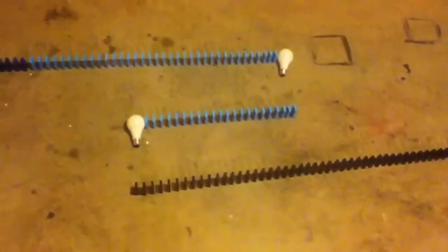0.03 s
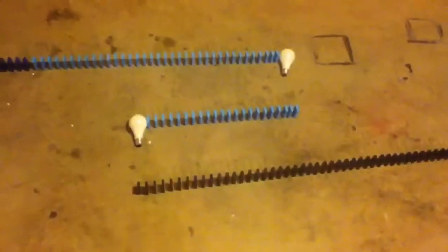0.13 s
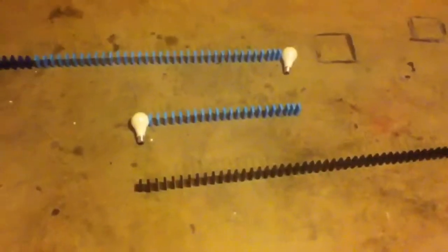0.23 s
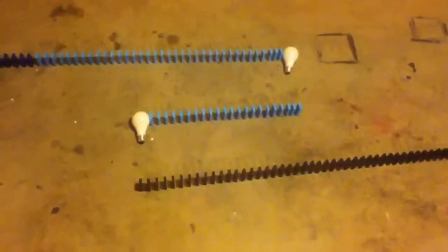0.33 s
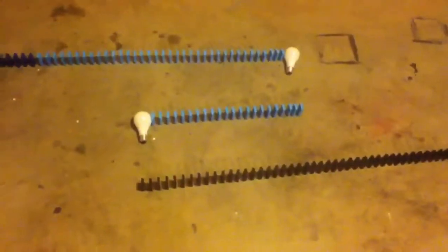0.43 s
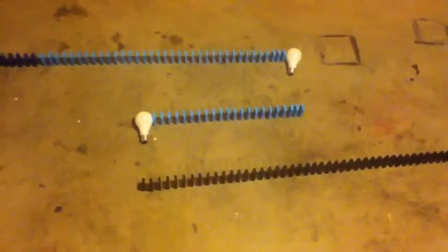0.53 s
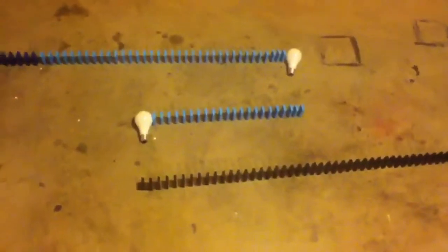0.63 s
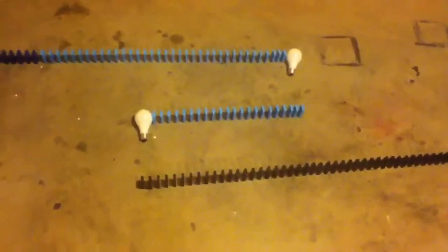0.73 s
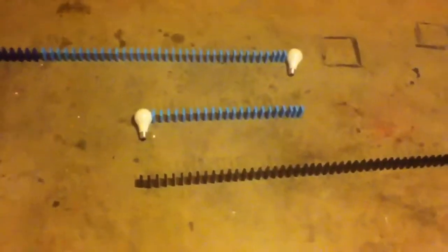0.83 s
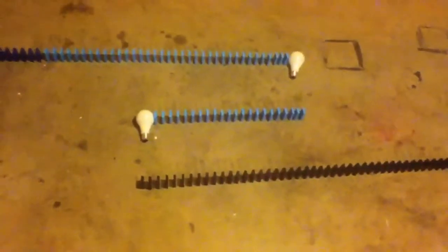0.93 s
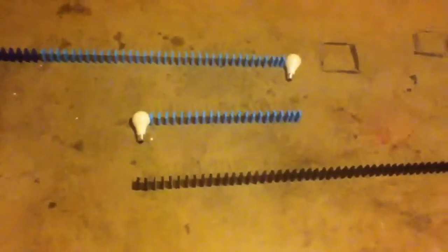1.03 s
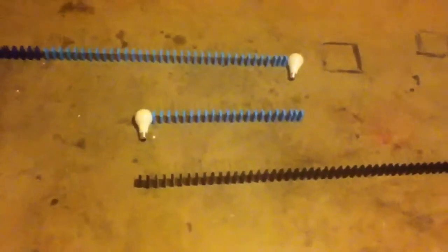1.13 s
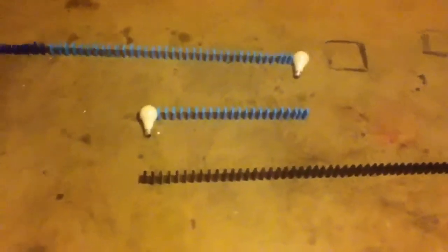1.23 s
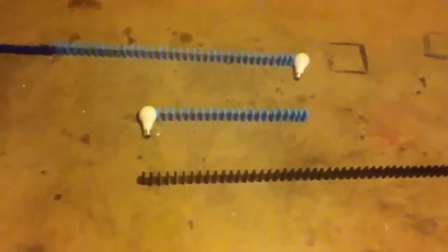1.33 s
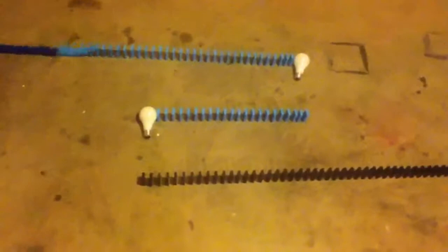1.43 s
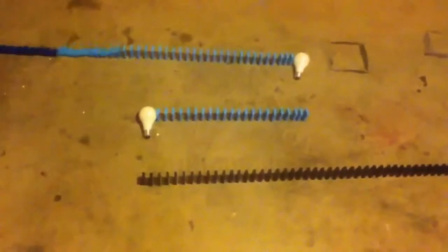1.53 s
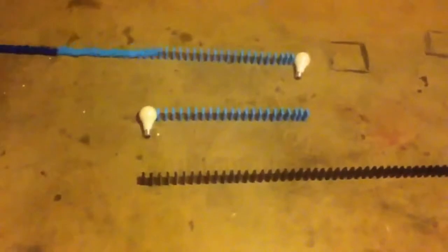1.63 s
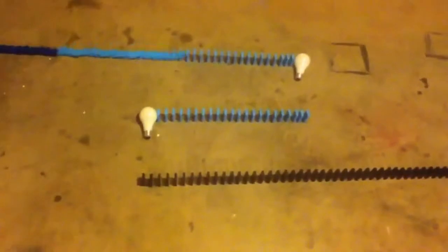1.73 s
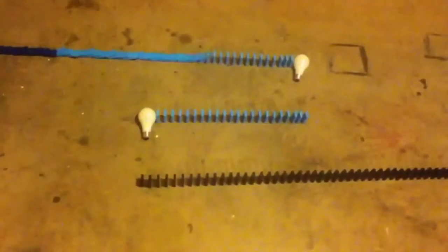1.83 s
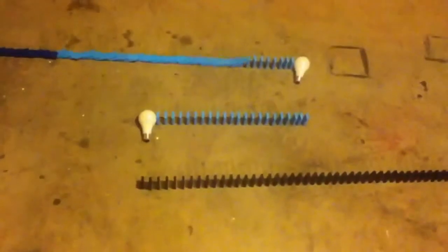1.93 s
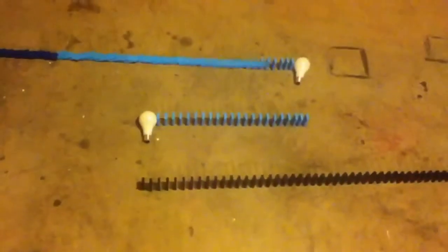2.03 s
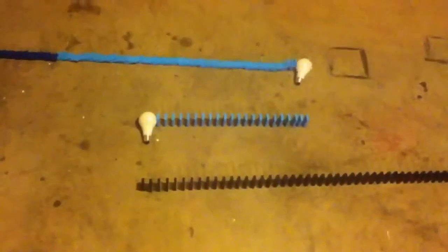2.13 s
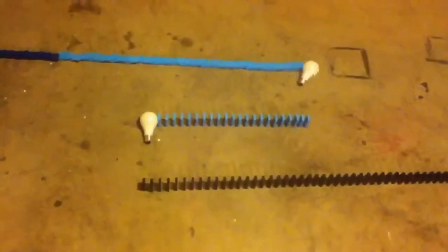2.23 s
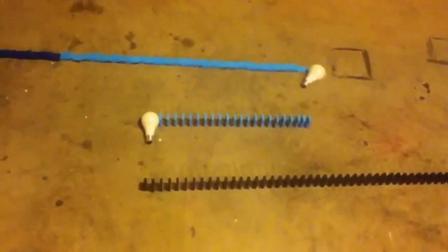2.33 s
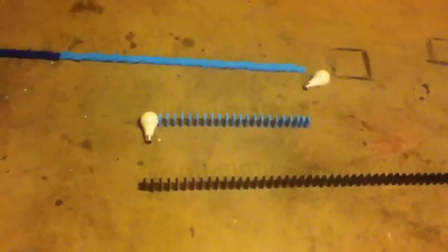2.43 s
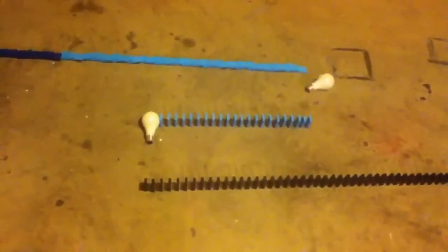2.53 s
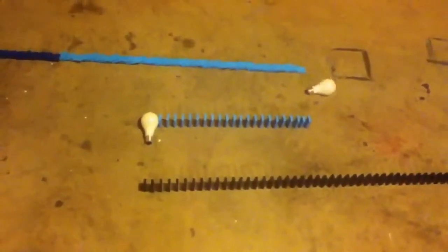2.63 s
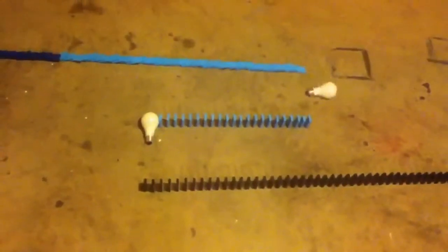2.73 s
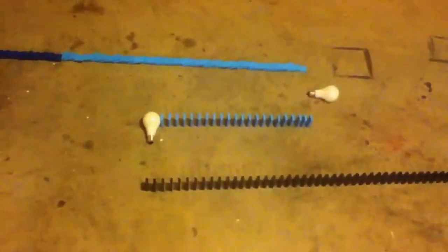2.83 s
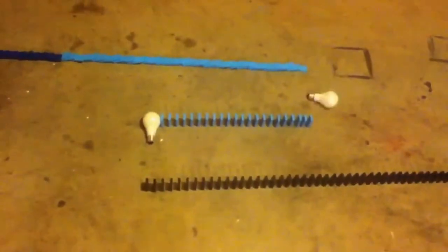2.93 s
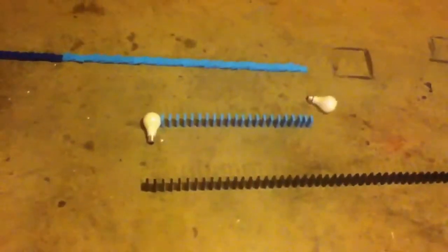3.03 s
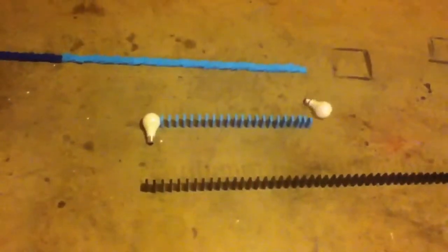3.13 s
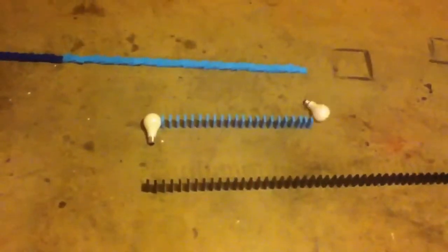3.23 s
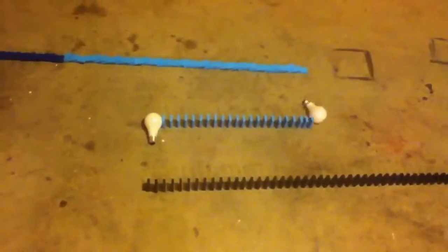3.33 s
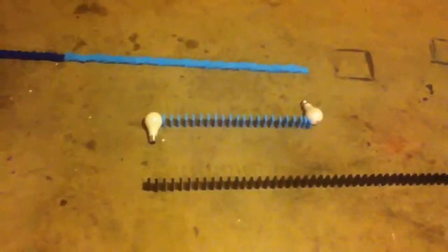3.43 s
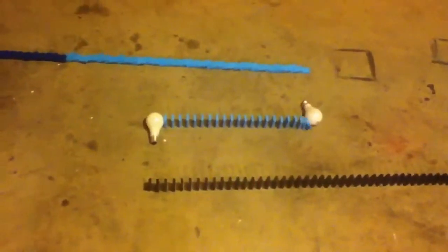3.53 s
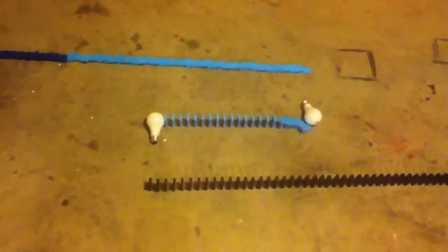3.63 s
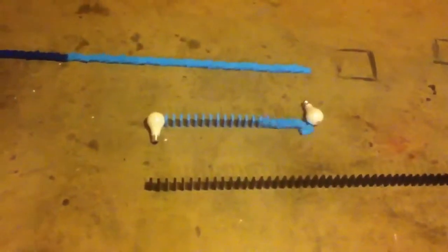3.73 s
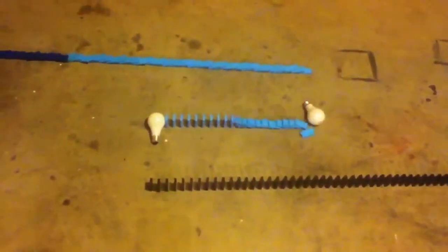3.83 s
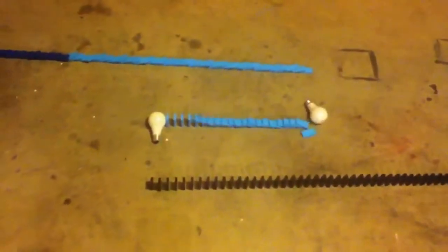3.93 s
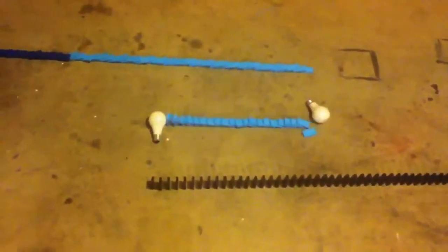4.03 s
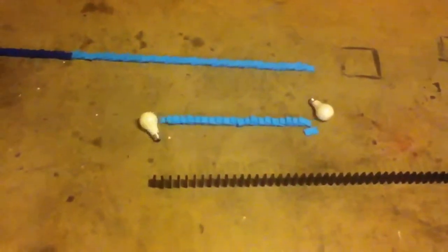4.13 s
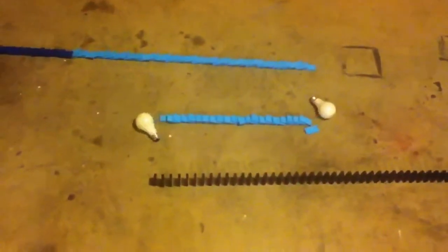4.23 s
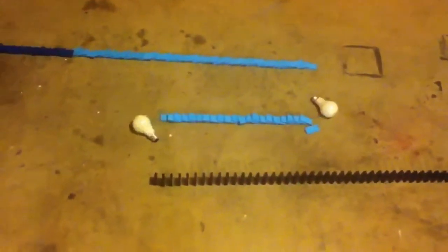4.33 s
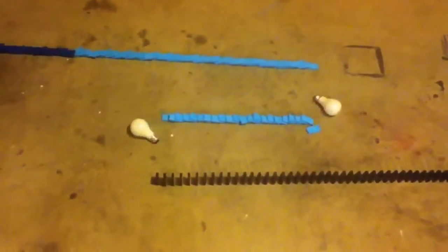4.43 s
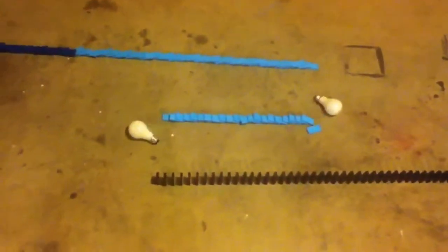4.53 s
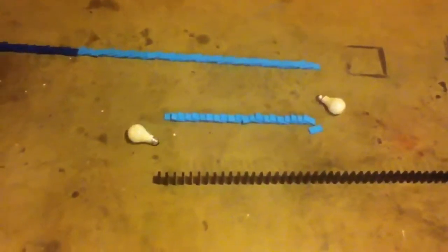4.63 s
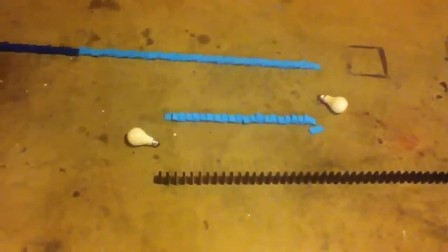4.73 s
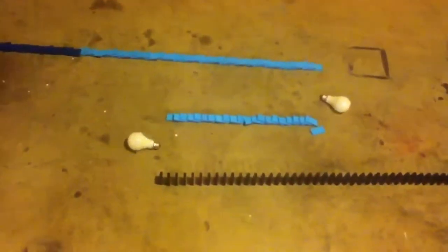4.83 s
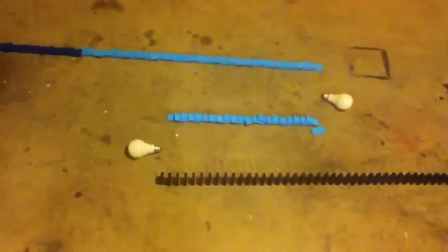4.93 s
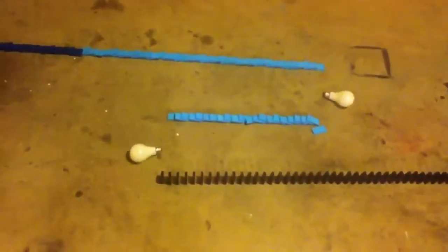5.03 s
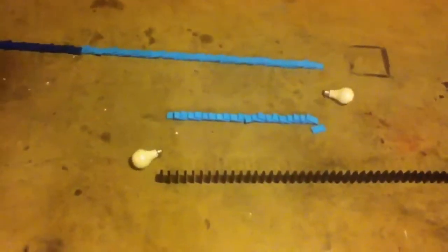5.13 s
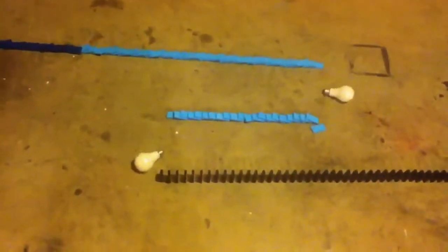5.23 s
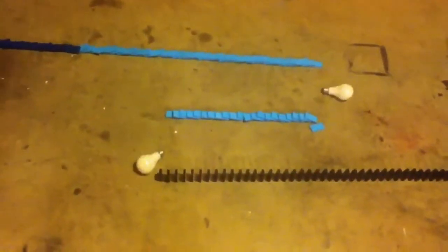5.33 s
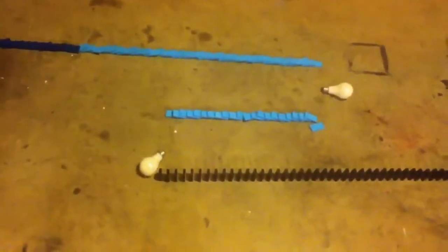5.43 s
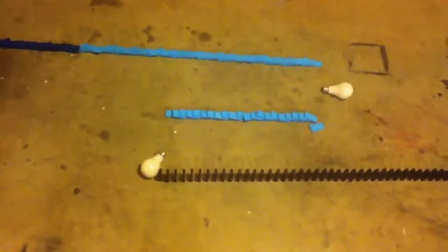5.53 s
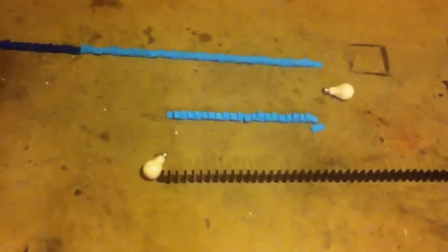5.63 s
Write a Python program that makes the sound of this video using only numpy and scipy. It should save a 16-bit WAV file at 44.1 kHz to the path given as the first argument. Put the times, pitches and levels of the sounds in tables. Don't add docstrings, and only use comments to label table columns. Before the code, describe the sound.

Over low ventilation hum in a bare, reverberant room, plastic dominoes begin with a few separate clicks, then speed into a dense bright clatter ending in sharp slaps and a clink of a glass bulb. After a near pause, small glass knocks start a second, shorter clatter. Another bulb clinks, rolls faintly over grit and gives a last tap. Heard from a phone held above the floor.

```python
import sys
import numpy as np
from scipy import signal
from scipy.fft import rfft, irfft
from scipy.io import wavfile
from scipy.ndimage import uniform_filter1d

SR = 44100
rng = np.random.default_rng(int(sys.argv[2]) if len(sys.argv) > 2 else 0)


def gain_from_db(level_db):
    decades = np.asarray(level_db, float) / 20
    return 10 ** decades


def inscribe(sig):
    pcm = np.round(np.clip(np.atleast_2d(sig).T, -1, 1) * 32767)
    wavfile.write(sys.argv[1], SR, pcm.astype(np.int16))


N = 250488


def colour(x, points):
    hz, db = np.transpose(points)
    f = np.fft.rfftfreq(len(x), 1 / SR) + 1
    gain_db = np.interp(np.log(f), np.log(hz), db)
    return irfft(rfft(x) * gain_from_db(gain_db), len(x))


def unit(x):
    return x / np.sqrt(np.mean(x ** 2))


def band(x, hz, width_hz):
    b, a = signal.iirpeak(hz, hz / width_hz, fs=SR)
    return signal.lfilter(b, a, x)


def decay(t, t60_s):
    return np.exp(-np.log(1000) * t / t60_s)


def ring(out, s, hz, db, t60_s):
    onset_s = 0.0015
    t = np.arange(int(1.2 * np.max(t60_s) * SR) + 1) / SR
    start = np.round(np.asarray(s) * SR).astype(int)
    wave = gain_from_db(db)[:, None] * np.sin(2 * np.pi * np.outer(hz, t))
    wave *= decay(t, np.asarray(t60_s)[:, None])
    wave *= 1 - np.exp(-t / onset_s)
    where = start[:, None] + np.arange(len(t))
    return out + np.bincount(where.ravel(), wave.ravel(), N + SR)[:N]


def cracks(s, db, points, length_s):
    size = 512
    burst = rng.standard_normal((len(s), size)) * np.exp(-np.arange(size) / (length_s * SR))
    burst *= (gain_from_db(db) / np.linalg.norm(burst, axis=1))[:, None]
    where = np.round(np.asarray(s) * SR).astype(int)[:, None] + np.arange(size)
    white = np.bincount(where.ravel(), burst.ravel(), N + SR)[:N]
    return colour(white, points)


def air():
    # t/s, level/dB, rumble relative level/dB
    air_course = [(0.0, -47, -4.5), (2.3, -46.5, -3.5), (2.5, -49, -2.5), (3.5, -48, -3),
                  (3.9, -47.5, -0.5), (5.68, -47.5, 1.5)]
    # f/Hz, level/dB per Hz
    air_spectrum = [(12, -68), (20, -26), (108, -6.5), (147, -12.5), (183, -1.5), (331, -13.5),
                    (463, -11.5), (548, -14.5), (725, -12), (1170, -20), (2640, -31), (3030, -25.5),
                    (3800, -30.5), (15000, -35.5), (16300, -65)]
    # f/Hz, width/Hz, level/dB
    duct_modes = [(97, 28, -14.5), (124.8, 6.7, -5.5), (174.1, 4.1, 0), (197, 6.1, 1), (256.4, 3, -6),
                  (365.7, 6.3, 0), (471.5, 5.1, -6), (577.6, 7.9, -9), (776, 1.8, -8.5), (3130, 25, -19),
                  (5320, 82, -18.5)]
    s, hum_db, rumble_db = np.transpose(air_course)
    t = np.arange(N) / SR
    broad = unit(colour(rng.standard_normal(N), air_spectrum))
    duct = sum(gain_from_db(db) * unit(band(rng.standard_normal(N), hz, width_hz))
               for hz, width_hz, db in duct_modes)
    rumble = unit(band(band(rng.standard_normal(N), 310, 100), 310, 100))
    swell = gain_from_db(2.2 * np.interp(t, s, rumble_db) - 3.5)
    mix = gain_from_db(-0.5) * broad + gain_from_db(-7.5) * duct + swell * rumble
    return gain_from_db(np.interp(t, s, hum_db)) * mix


def upper_modes(out, s, db):
    # f/Hz, level under the crack/dB, t60/s
    tile_modes = [(5400, -17, 0.041), (7560, -5, 0.011), (11550, -8, 0.018), (12600, -5, 0.013)]
    chance = rng.standard_normal((2, len(tile_modes), len(s)))
    for (mode_hz, mode_db, t60_s), spot, tuning in zip(tile_modes, *chance):
        own_hz = mode_hz * (1 + 0.015 * tuning)
        own_db = db + mode_db + 3.0 * spot
        out = ring(out, s, own_hz, own_db, np.full(len(s), t60_s))
    return out


def tiles(s, crack_db, ring_db, hz):
    # f/Hz, level/dB per Hz
    crack_spectrum = [(60, -91), (500, -27), (1200, -17), (2500, -7), (3900, -3.5), (5100, 5), (6500, -4),
                      (8500, -5), (10200, -10), (12500, -10.5), (14300, -15), (16000, -37)]
    first_mode_t60_s = 0.035
    out = cracks(s, crack_db + 19.5, crack_spectrum, length_s=0.0018)
    out = ring(out, s, hz, ring_db, np.full(len(s), first_mode_t60_s))
    return upper_modes(out, s, crack_db - 4)


def rows():
    # t/s, crack peak/dB, ring relative/dB, first mode f/Hz
    end_tiles = [(0.49, -33.5, -3, 4900), (0.5975, -25.5, 0.5, 4910), (0.6577, -23, -3, 5030),
                 (0.6953, -18.5, 2, 5130), (0.7284, -14.5, -6, 5060), (0.7576, -35, 9, 5030),
                 (2.4041, -16, 7.5, 5060), (2.4184, -6, -27, 5000), (3.6305, -29.5, -35, 4990),
                 (3.712, -21, 1.5, 4910), (3.7567, -15.5, -0.5, 5150), (3.7909, -14, 2, 5110),
                 (4.246, -10.5, -4, 5180), (4.2713, -10, 1, 5260)]
    bounces = [(0.6034, -28.5, -9, 4900), (0.6609, -18.5, -23, 4920), (2.434, -39, 8, 5260),
               (2.4664, -15, 2.5, 5000), (2.4804, -31, 5, 5320), (3.476, -40.5, 7.5, 5160),
               (3.5484, -50, 8, 5170), (4.2854, -19.5, 9.5, 4990)]
    # t/s, crack peak/dB, ring level/dB
    first_blows = [(0.7788, -17.5, -19), (0.8073, -21, -24), (0.8253, -16, -32), (0.903, -15, -25),
                   (1.0143, -15.5, -27), (1.1297, -14, -18), (1.1655, -10, -16), (1.1932, -10, -15),
                   (1.2383, -12.5, -13.5), (1.331, -15.5, -18), (1.3545, -14.5, -14), (1.4288, -14.5, -8.5),
                   (1.4546, -14, -12), (1.543, -12.5, -10.5), (1.6168, -24, -19), (1.6907, -12, -25),
                   (1.7101, -10.5, -22), (1.782, -14.5, -15.5), (1.8001, -16.5, -18), (1.8289, -11.5, -11),
                   (1.8707, -14.5, -32), (1.9437, -16.5, -22), (1.9711, -18, -24), (1.9938, -13.5, -17),
                   (2.034, -12.5, -10), (2.0598, -13, -19), (2.1525, -21, -12), (2.2049, -12, -15),
                   (2.2555, -26, -15)]
    second_blows = [(3.8159, -10, -19), (3.8442, -23, -13), (3.8693, -11, -11), (3.8948, -12.5, -8),
                    (3.963, -13, -14), (3.9838, -10, -17), (4.0111, -13.5, -17), (4.0307, -9, -12.5),
                    (4.1057, -11, -10), (4.1224, -13, -13), (4.1442, -8, -16.5), (4.1693, -9.5, -20)]
    # t/s, ring level/dB, first mode f/Hz
    falling_waves = [
        [(0.745, -15, 5070), (0.79, -19.5, 5025), (1.09, -19, 4920), (1.3, -19, 5090), (1.46, -15, 4947),
         (1.6, -17.5, 5204), (1.9, -19.5, 5090), (2.26, -14.5, 5063), (2.3, -31, 4970)],
        [(3.8, -33, 5200), (3.83, -30, 5010), (3.92, -14, 5100), (4.01, -22, 5110), (4.076, -14.5, 4790),
         (4.144, -19.5, 5190), (4.2, -20, 5160)],
    ]
    tile_gap_s, chatter_per_s = 0.024, 420
    blow_crack_db, blow_ring_db, wave_crack_db = 1, 3.5, -6.5
    ring_scatter_db, tuning_spread = 6, 0.065

    s, crack_db, ring_db, hz = np.transpose(sorted(end_tiles + bounces))
    out = tiles(s, crack_db - 3.5, crack_db + ring_db - 2.5, hz)
    for wave, blows in zip(falling_waves, (first_blows, second_blows)):
        wave_s, wave_db, wave_hz = np.transpose(wave)
        clear_s, clear_crack_db, clear_ring_db = np.transpose(blows)
        gaps = np.maximum(np.round(np.diff(clear_s) / tile_gap_s), 1).astype(int)
        paced_s = np.concatenate([np.linspace(a, b, n + 1)[1:-1]
                                  for a, b, n in zip(clear_s, clear_s[1:], gaps)])
        wait, size, tuning, strength = rng.random((4, N // 100))
        loose_s = wave_s[0] + np.cumsum(-np.log(wait)) / chatter_per_s
        loose_s = loose_s[loose_s < wave_s[-1]]
        soft_s = np.concatenate([paced_s, loose_s])
        when_s = np.concatenate([clear_s, soft_s])

        loose_db = -11 + 7 * size[:len(loose_s)] ** 3
        size_db = np.append(np.full(len(paced_s), -3.0), loose_db)
        soft_db = np.interp(soft_s, wave_s, wave_db) + size_db
        ring_db = np.append(clear_ring_db + blow_ring_db, soft_db)
        crack_db = np.append(clear_crack_db + blow_crack_db, soft_db + wave_crack_db + 9.5)
        detune = tuning_spread * (tuning[:len(when_s)] - 0.5)
        own_hz = np.interp(when_s, wave_s, wave_hz) * (1 + detune)
        ring_db = ring_db + 2 * ring_scatter_db * (strength[:len(when_s)] - 0.5)
        out = out + tiles(when_s, crack_db, ring_db, own_hz)
    return out


def thuds(knocks):
    # f/Hz, level/dB per Hz
    thud_spectrum = [(60, -79.5), (400, -10), (900, 1.5), (1400, 5), (2200, 9), (4000, -6.5), (7000, -16),
                     (16000, -41)]
    s, db, thud_db, _ = np.transpose(knocks)
    return cracks(s, db + thud_db + 21.5, thud_spectrum, length_s=0.00033)


def flutter():
    rate_per_s, depth = 55, 0.2
    hold = SR // rate_per_s
    steps = np.repeat(rng.standard_normal(N // hold + 1), hold)
    return 1 + depth * uniform_filter1d(steps, size=hold)[:N]


def glass(knocks, modes, upper_db):
    swell_s, upper_per_thud = 0.004, 0.33
    t, out = np.arange(N) / SR, np.zeros(N)
    for k, (hz, mode_db, share) in enumerate(modes):
        envelope = np.zeros(N)
        for s, db, thud_db, t60_s in knocks:
            start = int(s * SR)
            since = t[:min(SR, N - start)]
            peak_db = db + mode_db
            if k > 0:
                peak_db += upper_db + upper_per_thud * thud_db
            swell = 1 - np.exp(-since / swell_s)
            envelope[start:start + SR] += gain_from_db(peak_db) * swell * decay(since, share * t60_s)
        out += envelope * flutter() * np.sin(2 * np.pi * hz * t)
    return out


def slaps():
    # t/s, peak/dB, upper modes relative/dB
    landings = [
        (2.4186, -9.5, -4),
        (2.4228, -7, -8),
        (3.983, -12, 0.5),
        (4.2714, 0, -20),
    ]
    # f/Hz, level/dB per Hz
    slap_spectrum = [(500, -48), (1500, -13), (2600, -2.5), (4500, -2.5), (7000, 1), (12000, -4.5),
                     (14500, -4), (16500, -25)]
    s, db, upper_db = np.transpose(landings)
    crack = cracks(s, db + 11, slap_spectrum, length_s=0.00012)
    return upper_modes(crack, s, db + upper_db + 8)


def rolling():
    # t/s, level/dB
    roll_course = [
        (4.84, -90),
        (4.95, -66),
        (5.1, -59),
        (5.3, -60),
        (5.4, -66),
        (5.55, -90),
    ]
    # f/Hz, level/dB per Hz
    grit_spectrum = [(60, -80), (400, -12), (900, 4), (1400, 7.5), (2200, -5.5), (4000, -19), (16000, -50)]
    # t/s, peak/dB, f/Hz, t60/s
    far_bump = (5.515, -34, 307.5, 0.1)
    ticks_per_s = 150
    s, db = np.transpose(roll_course)
    ticks = rng.standard_normal(N) * (rng.random(N) < ticks_per_s / SR)
    grind = unit(colour(ticks, grit_spectrum)) * gain_from_db(np.interp(np.arange(N) / SR, s, db))
    bump_s, bump_db, bump_hz, bump_t60_s = far_bump
    return ring(grind, [bump_s], [bump_hz], [bump_db], [bump_t60_s])


def room(x):
    # delay t/s, level/dB
    hard_echoes = [(.0042, -10.5), (.0071, -31.5), (.016, -11), (.021, -15.5)]
    # f/Hz, t60/s
    tail_decay = [(500, 0.49), (1000, 0.82), (2000, 0.66), (4000, 0.49), (6000, 0.49), (9000, 0.41),
                  (13000, 0.32)]
    tail_db, tail_rise_s = 0.5, 0.002
    t = np.arange(SR) / SR
    spectrum = rfft(rng.standard_normal(SR))
    log_f = np.log(np.arange(SR // 2 + 1) + 1.0)
    hz, t60_s = np.transpose(tail_decay)
    tail = np.zeros(SR)
    for share, band_t60_s in zip(np.eye(len(hz)), t60_s):
        tail += irfft(spectrum * np.interp(log_f, np.log(hz), share), SR) * decay(t, band_t60_s)
    tail *= 1 - np.exp(-t / tail_rise_s)
    response = gain_from_db(tail_db) * tail / np.sqrt(np.sum(tail ** 2))
    response[0] = 1
    for s, db in hard_echoes:
        response[int(s * SR)] += gain_from_db(db)
    return signal.fftconvolve(x, response)[:N]


def scene():
    # t/s, ring peak/dB, thud relative/dB, ring t60/s
    first_knocks = [(2.253, -16.5, 0, 0.18), (2.292, -14.5, -14, .19), (2.312, -14, -23, 0.14),
                    (2.338, -14.5, -21, 0.091), (2.385, -22, -26, 0.069), (2.54, -45.5, -27, 0.37),
                    (2.8, -64, -20, 0.7), (3.05, -60, -15, .8), (3.285, -50.5, -1, 0.13),
                    (3.3605, -26, -1, 0.27), (3.375, -28.5, 0.5, .17), (3.476, -30.5, 6, 0.11),
                    (3.5485, -30.5, 1, 0.12), (3.630, -31.5, -21, .13), (3.7125, -28, -10.5, 0.15),
                    (3.757, -28.5, 3, 0.37), (3.79, -24, -4, 0.23)]
    second_knocks = [(4.168, -10, -8, 0.21), (4.2, -24, 0, 0.7), (4.286, -27.5, -20, 0.81),
                     (4.86, -52.5, -5, 0.34), (4.983, -46.5, 8.5, 0.22), (5.079, -54.5, 11, .2),
                     (5.111, -52, 7, 0.17), (5.146, -42, 2, 0.16), (5.193, -58.5, 12, .2),
                     (5.235, -43, -1, .2), (5.254, -55, 6, .2), (5.297, -51, -1, .2), (5.33, -55, -4, .2),
                     (5.36, -42.5, -12, 0.18), (5.6663, -27.5, -8, 0.23)]
    # f/Hz, level/dB, share of the ring time
    first_bulb = [(2406, 0, 1.), (6200, 0, .9), (8236, -6, .7), (11300, -14, .4)]
    second_bulb = [(2610, 3.5, 0.31), (5800, -4.5, 0.38), (9000, -25, .4)]
    onset_s, glass_wet_db, glass_dry_db = 0.001, -16, -2.0
    floor = rows() + thuds(first_knocks + second_knocks) + slaps() + rolling()
    bulbs = glass(first_knocks, first_bulb, upper_db=-17)
    bulbs = bulbs + glass(second_knocks, second_bulb, upper_db=-4)
    heard = room(floor + gain_from_db(glass_wet_db) * bulbs) + gain_from_db(glass_dry_db) * bulbs
    heard = np.append(np.zeros(int(onset_s * SR)), heard)[:N]
    return (heard + air())[None, :]


def band_limit(x):
    return signal.sosfilt(signal.butter(12, 16470, fs=SR, output="sos"), x)


def record(dry):
    ceiling, top_hz, bins = 0.92, 16470, 12
    mask_db, mask_scatter_db, mask_band_db = -36.5, 3, 6.5
    x = dry[0] / (1 + (dry[0] / ceiling) ** 4) ** 0.25
    f, _, z = signal.stft(x, SR, "cosine", nperseg=2048)
    power = uniform_filter1d(np.abs(z) ** 2, size=bins, axis=0)
    loudest = power[f > 4000].max(axis=0)
    frame_db = mask_db + mask_scatter_db * rng.standard_normal(len(loudest))
    bands = rng.standard_normal((len(f) // bins + 1, len(loudest)))
    bands = uniform_filter1d(bands, size=4, axis=1)
    threshold_db = frame_db + 2 * mask_band_db * np.repeat(bands, bins, axis=0)[:len(f)]
    clear = power > loudest * gain_from_db(2 * threshold_db)
    keep = (clear | (f < 6000)[:, None]) & (f < top_hz)[:, None]
    x = signal.istft(z * keep, SR, "cosine", nperseg=2048)[1]
    return band_limit(x[None, :N])


dry = scene()
out = record(dry)
inscribe(out)
```